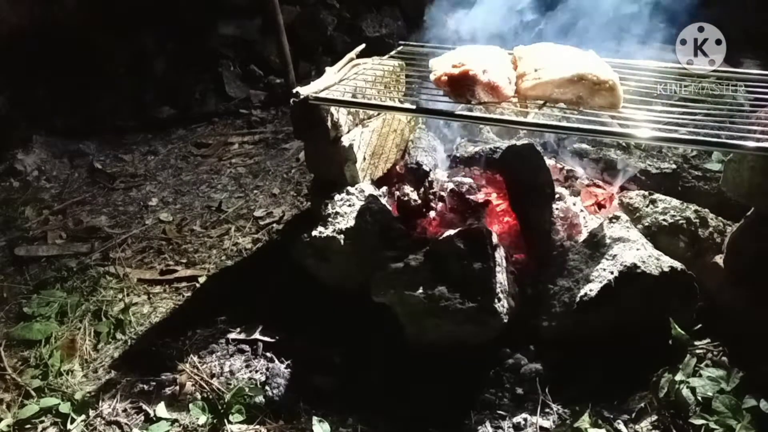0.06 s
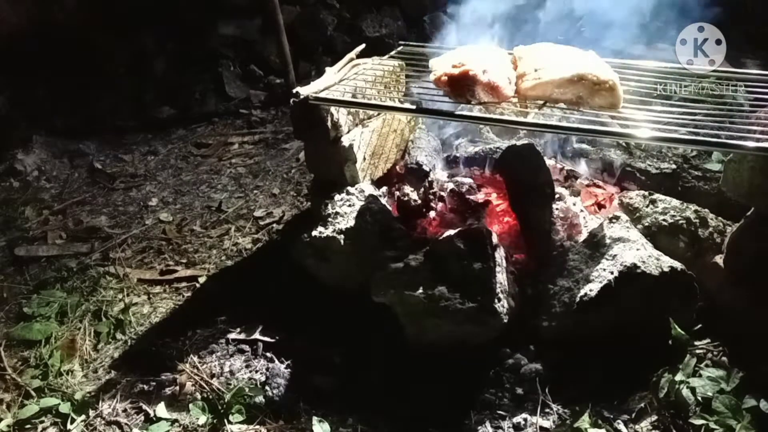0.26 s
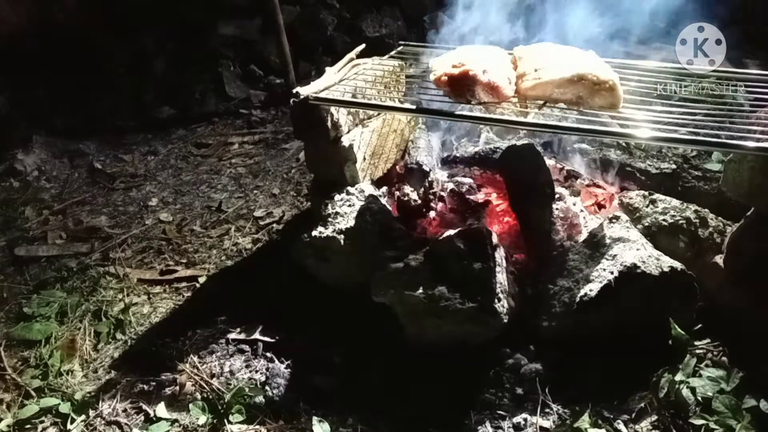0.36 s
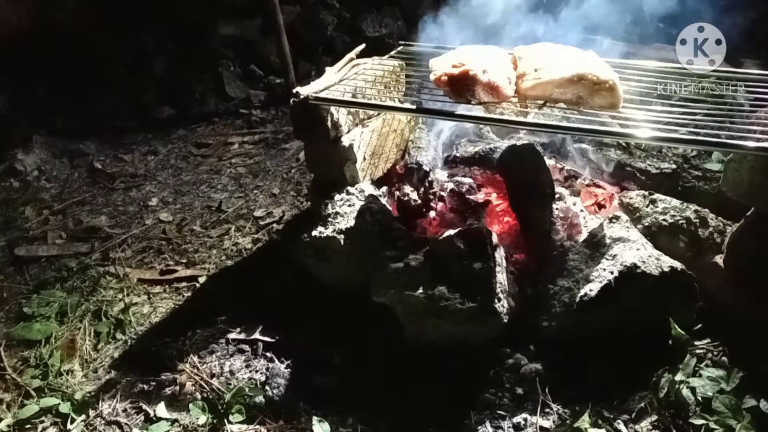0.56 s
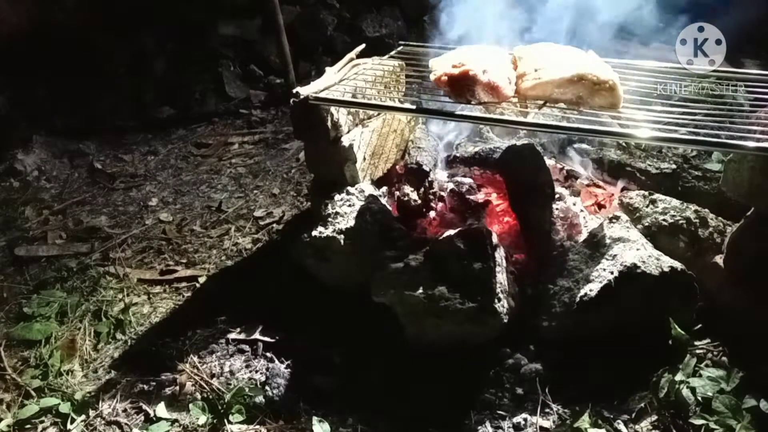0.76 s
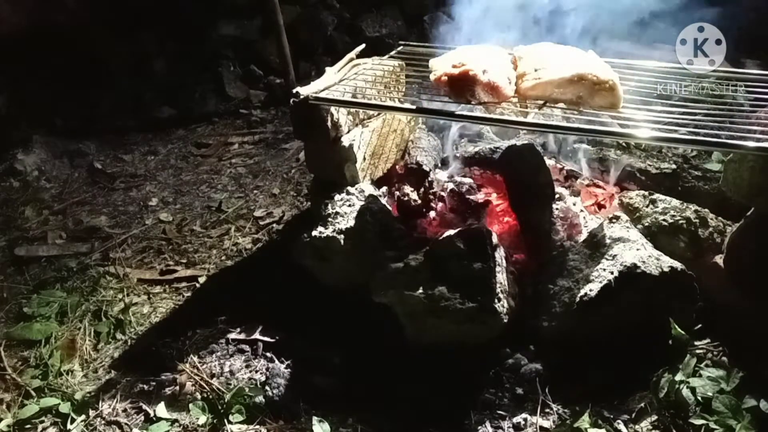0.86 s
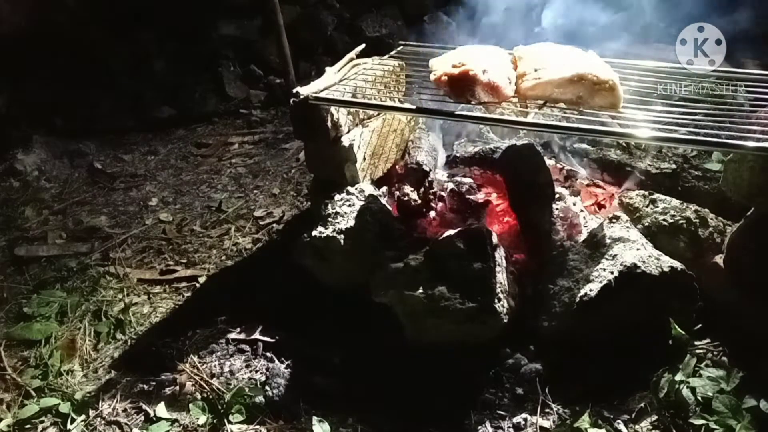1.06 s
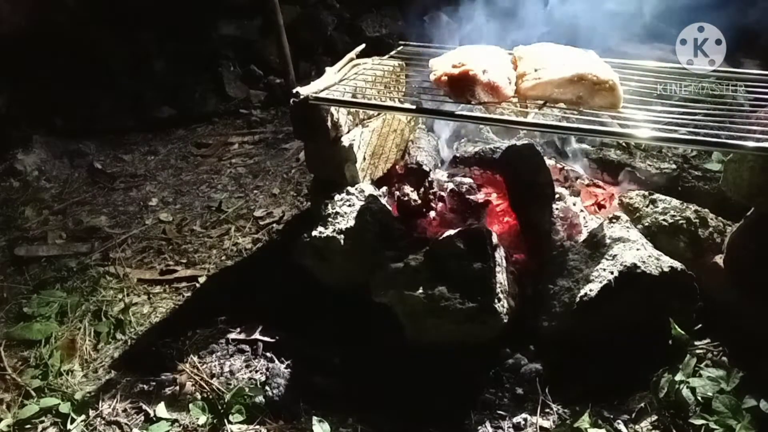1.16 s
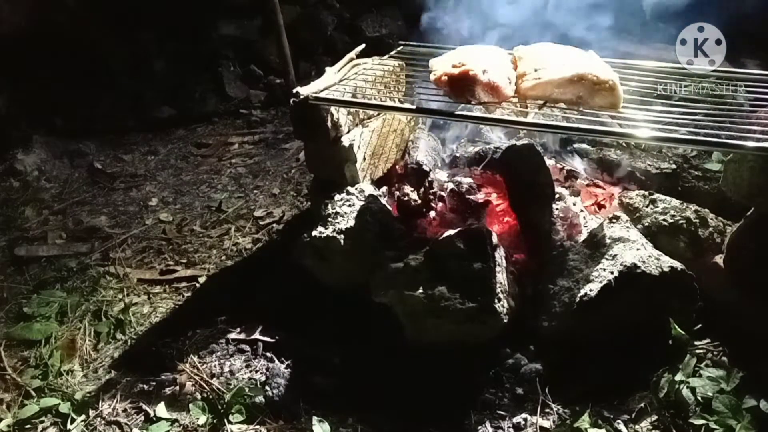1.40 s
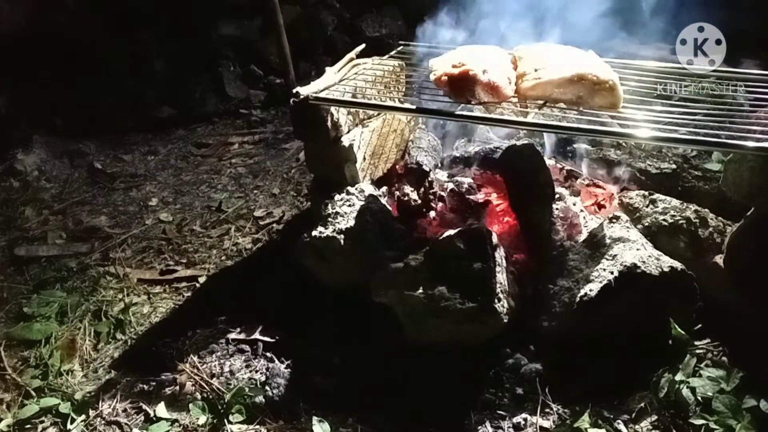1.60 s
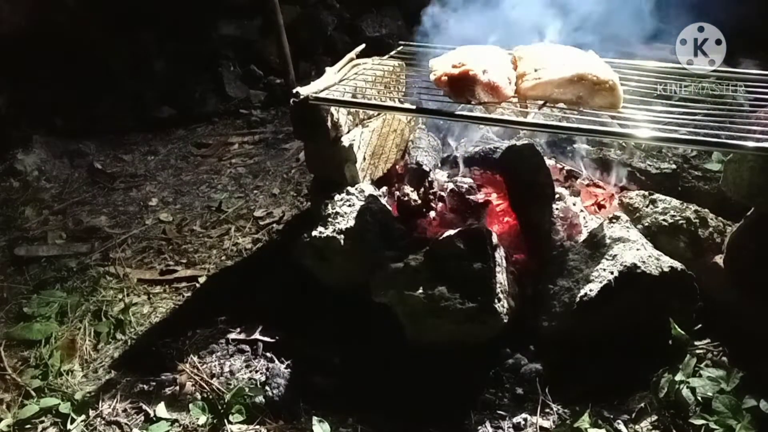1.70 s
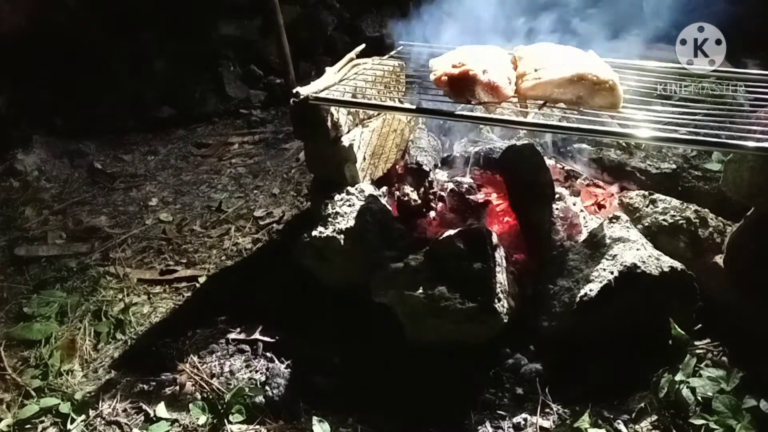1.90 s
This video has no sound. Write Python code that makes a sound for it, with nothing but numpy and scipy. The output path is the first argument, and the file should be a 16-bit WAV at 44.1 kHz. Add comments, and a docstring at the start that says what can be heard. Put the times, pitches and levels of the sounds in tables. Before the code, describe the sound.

A small hollow vessel lands with a bright clack, rings briefly and knocks about unevenly, close to the microphone; campfire embers tick and hiss faintly over a low rumble, while crickets trill in the night woods.

```python
"""Something hollow, probably cookware, is set down with a clack and knocks about, ringing briefly: each
knock sums a decaying tone, bursts of coloured noise and a bank of damped modes. It stands by a campfire
at night, whose embers tick and crackle (short decaying noise) and hiss over a low rumble (filtered noise).
Crickets trill in the woods: pulsed sines, smeared by a decaying noise response."""
import sys
import numpy as np
from scipy import signal
from scipy.fft import rfft, irfft, next_fast_len
from scipy.io import wavfile
from scipy.ndimage import map_coordinates

SR = 44100
rng = np.random.default_rng(int(sys.argv[2]) if len(sys.argv) > 2 else 0)


def output_pcm(signal):
    """Save a mono or channel-first signal as 16-bit PCM at the path in sys.argv[1].

    Samples are clipped to [-1, 1] before scaling.
    """
    pcm = np.clip(np.atleast_2d(signal).T, -1, 1) * 32767
    wavfile.write(sys.argv[1], SR, np.round(pcm).astype(np.int16))


N = 83790
T = np.arange(N) / SR  # time in s
RATTLE_S = 0.0088  # the sound builds up while the contact chatters; 60 dB approach time

# The blows on the hollow vessel, levels before the vessel's low cut. Each row: start in seconds, level of
# the hollow tone in dB, its pitch in Hz, level of the clack in dB, of the crack in dB, of the ring in dB,
# the two pitches, in Hz, around which the ring is favoured, their lift in dB, ring tilt in dB per octave.
VESSEL_KNOCKS = [(.206, -20.5, 748, -26.5, -21, -30.5, 781, 3886, 3, 0),
                 (0.4907, -18.5, 853, -34, -50, -39, 980, 1620, 7.1, -5),
                 (.5445, -23, 830, -37, -56, -40, 1180, 1700, 13, -2.5),
                 (.607, -30.5, 714, -50, -70, -61, 890, 2228, 12, -4),
                 (.691, -37.5, 770, -82, -79, -63, 781, 2650, 3, -16),
                 (.7425, -22, 770, -47, -63, -47, 1130, 990, 21, -3),
                 (.919, -38.5, 809, -69, -74, -68, 890, 1620, 8.2, -1.5),
                 (.9835, -46, 900, -49, -62, -55, 1141, 1830, 22, -1),
                 (1.077, -33.5, 863, -49, -49.5, -57, 938, 1141, 10.4, -5),
                 (1.2765, -33, 896, -44, -41, -55.5, 890, 2783, 8, -2.5),
                 (1.4055, -19, 746, -45, -45, -48, 781, 2630, 12.4, -4.5),
                 (1.5755, -34.5, 859, -55.5, -46.5, -68, 2700, 3680, 17, -1),
                 (1.704, -45.5, 866, -76, -83, -85, 890, 2640, 4.2, -10)]


def amp(db):
    """Level law: decibels to amplitude gain."""
    return 10 ** (np.asarray(db) / 20)


def unit(x):
    """Normalisation: scale to rms 1."""
    return x / np.sqrt(np.mean(x ** 2) + 1e-20)


def fade(t60):
    """Exponential decay from time zero, falling 60 dB in t60 seconds."""
    return np.exp(-np.log(1000) * T / t60)


def filtered(x, response):
    """Linear filtering: the spectrum of x times a response of frequency."""
    size = next_fast_len(N + 8192)
    spectrum = rfft(x, size) * response(np.fft.rfftfreq(size, 1 / SR))
    return irfft(spectrum, size)[:N]


def noise(points):
    """Coloured noise: white noise shaped by (Hz, dB) points along log frequency, at rms 1."""
    f, db = np.transpose(points)
    white = rng.standard_normal(N)
    return unit(filtered(white, lambda hz: amp(np.interp(np.log(hz + 1), np.log(f), db))))


def wobble(rate, t=T):
    """Random modulation: a smooth curve through normal random knots, rate knots a second."""
    return map_coordinates(rng.standard_normal(4096), [t * rate], mode="wrap")


def delayed(x, s):
    """Pure delay: x starting s seconds later."""
    return np.pad(x, (max(round(s * SR), 0), 0))[:N]


def hollow_tone(pitch):
    """Cavity resonance: one damped sine with a soft onset, answered by a nearby surface."""
    t60, rise_s = 0.06, 0.0015
    echo_s, echo_db = 0.012, -9
    tone = np.sin(2 * np.pi * pitch * T) * fade(t60) * (1 - np.exp(-(T / rise_s) ** 2))
    return tone + amp(echo_db) * delayed(tone, echo_s)


def contact_burst(clack_db, crack_db):
    """Impact noise: dense clack and brighter crack, each with a fast decay and a weaker, slower tail."""
    # Spectrum of the clack. Each row: frequency in Hz, level in dB.
    clack_colour = [(300, -25), (500, -24), (620, 8), (900, 3), (1050, -12.5), (1600, 1), (2200, -5.5),
                    (2700, 2.5), (3100, -22), (4000, -8), (6000, -20), (10000, -49)]
    # Spectrum of the crack. Each row: frequency in Hz, level in dB.
    crack_colour = [(1500, -27), (3500, -1), (5500, 1.5), (8000, 1), (10500, 0.5), (13000, -5),
                    (16000, -17)]
    clack_t60, clack_tail_db, clack_tail_t60 = 0.089, -19, .28
    crack_t60, crack_tail_db, crack_tail_t60 = 0.046, -19, .2
    clack = noise(clack_colour) * (fade(clack_t60) + amp(clack_tail_db) * fade(clack_tail_t60))
    crack = noise(crack_colour) * (fade(crack_t60) + amp(crack_tail_db) * fade(crack_tail_t60))
    return (amp(clack_db) * clack + amp(crack_db) * crack) * (1 - fade(RATTLE_S))


def vessel_ring(ring_db, focus_hz, lift_db, tilt_db):
    """Modal synthesis: damped sines, the modes that the point of contact favours being lifted."""
    # The vessel's upper modes. Each row: frequency in Hz, level in dB, 60 dB decay time in seconds.
    vessel_modes = [(779, 3, .26), (890, -6, .22), (938, 0, .3), (980, -11, .25), (1141, -7, .17),
                    (1168, -12, .22), (1320, -8, .2), (1451, 1, .17), (1620, -7, .14), (1770, -6, .14),
                    (1948, 0, .11), (2228, -5, .18), (2380, -5, .1), (2700, -1, .11), (2783, -4, .16),
                    (2857, -3, .19), (2986, -7, .24), (3241, -3, .16), (3680, -7, .17), (3886, -10, .3),
                    (4160, -6, .18), (4520, -6, .13), (5447, -8, .15), (5882, -8, .13), (6205, -7, .1),
                    (7910, -4, .12), (9245, 0, .07)]
    focus_oct = .055  # width of the favoured region in octaves
    waver_rad, waver_per_s = .55, 45  # phase waver and its knots a second
    hz, level, t60 = np.transpose(vessel_modes)
    t = T[:SR // 3]
    decays = np.exp(-np.log(1000) * t / t60[:, None]) * (1 - fade(RATTLE_S)[:len(t)])
    favour = sum(np.exp(-(np.log2(hz / f) / focus_oct) ** 2) for f in focus_hz)
    # a random phase waver roughens the ring
    waver = waver_rad * np.array([wobble(waver_per_s, t) for _ in hz])
    start_cycle = rng.random((len(hz), 1))
    modes = decays * np.sin(2 * np.pi * (hz[:, None] * t + start_cycle) + waver)
    gains = amp(ring_db + level + lift_db * favour + tilt_db * np.log2(hz / hz[0]))
    return np.pad(gains @ modes, (0, N - len(t)))


def knocks():
    """Impact excitation: each blow sums cavity tone, contact noise and modes, with little radiated low down."""
    baffle_hz = 528  # the small vessel radiates little below this
    out = np.zeros(N)
    for s, hollow_db, pitch, clack_db, crack_db, ring_db, *focus_hz, lift_db, tilt_db in VESSEL_KNOCKS:
        hollow = amp(hollow_db) * hollow_tone(pitch)
        burst = contact_burst(clack_db, crack_db)
        ring = vessel_ring(ring_db, focus_hz, lift_db, tilt_db)
        out += delayed(hollow + burst + ring, s)
    return signal.sosfilt(signal.butter(6, baffle_hz, "high", fs=SR, output="sos"), out)


def bending_ring():
    """Mode of varying frequency: the lowest mode sings on, bends as the vessel tilts and is damped."""
    # Pitch path of the lowest mode. Each row: time in seconds, frequency in Hz.
    pitch_path = [(.21, 589.6), (0.359, 598), (.46, 620), (0.519, 596), (.6, 564)]
    level_db, t60 = -44.5, 1.45
    damp_s = 0.026  # time constant of the damping after the last point of the path
    s, hz = np.transpose(pitch_path)
    tone = np.sin(2 * np.pi * np.cumsum(np.interp(T, s, hz)) / SR)
    damping = np.exp(-np.maximum(T - s[-1], 0) / damp_s)
    envelope = delayed(fade(t60) * (1 - fade(RATTLE_S)), VESSEL_KNOCKS[0][0])
    return amp(level_db) * tone * envelope * damping


def thud():
    """Damped oscillation: a soft, low sine as one knock also bumps the ground."""
    start_s, level_db, hz, t60 = 1.277, -31, 321, 0.036
    bump = np.sin(2 * np.pi * hz * T) * fade(t60) * (1 - fade(RATTLE_S))
    return amp(level_db) * delayed(bump, start_s)


def ticks():
    """Impulsive emission: sharp ember snaps with a faint scatter, over a random crackle of tiny ones."""
    # The separate ember snaps. Each row: start in seconds, peak level before the scatter in dB.
    ember_ticks = [(0.0422, -32.5), (0.1136, -36), (.130, -28.5), (.1675, -27.5), (.343, -42),
                   (0.347, -26.5), (.366, -45), (.5236, -15), (.8193, -28.5), (0.825, -36), (.9092, -24.5),
                   (1.0214, -26.5), (1.0633, -34), (1.263, -34), (1.2982, -28.5), (1.3895, -29),
                   (1.6955, -41)]
    # Spectrum of snaps, scatter and crackle. Each row: frequency in Hz, level in dB.
    tick_colour = [(1000, -23), (3000, -20), (6000, -14), (8500, 3.5), (12000, -1), (16000, -2)]
    snap_t60, scatter_db, scatter_t60 = 0.0024, -20, 0.042
    crackle_per_s, crackle_db, crackle_spread_db = 23, -53, 4
    out = np.zeros(N)
    for s, db in ember_ticks:
        snap = noise(tick_colour) * fade(snap_t60)
        scatter = amp(scatter_db) * noise(tick_colour) * fade(scatter_t60)
        out += amp(db) * delayed(snap / np.abs(snap).max() + scatter, s)
    strengths = amp(crackle_db + crackle_spread_db * rng.uniform(-0.88, 1, N))
    sparks = (rng.random(N) < crackle_per_s / SR) * strengths
    crackle = signal.fftconvolve(sparks, fade(snap_t60))[:N] * noise(tick_colour)
    return out + crackle


def sizzle():
    """Amplitude-modulated noise: a grainy hiss that swells in brief spurts."""
    # The sizzling spurts. Each row: centre in seconds, half length (to 1/e) in seconds, mean level in dB.
    spurts = [(.14, 0.045, -57), (0.348, 0.034, -46)]
    # Spectrum of the hiss. Each row: frequency in Hz, level in dB per Hz.
    hiss_colour = [(1200, -16), (2500, -12), (3600, -10.5), (5000, -6.5), (7600, -2.5), (8800, 1),
                   (12000, -1.5), (15500, -3.5)]
    steady = amp(-59)
    swells = sum(amp(db + 4.7 * wobble(253.7)) * np.exp(-((T - s) / half) ** 2) for s, half, db in spurts)
    grain = amp(1.0 * wobble(650))
    return (steady + swells) * grain * noise(hiss_colour)


def frying():
    """Decaying noise source: a lower sizzle that wavers as it dies down."""
    # Spectrum of the frying. Each row: frequency in Hz, level in dB per Hz.
    fry_colour = [(800, -17), (1800, -5.5), (4000, -2.5), (7000, -0.5), (12000, -22)]
    start_db, fall_db_per_s, swing_db = -67.5, 6.5, 2.5
    return amp(start_db - fall_db_per_s * T + swing_db * wobble(29.85)) * noise(fry_colour)


def rumble():
    """Low-frequency noise: the rumble of the fire, gently unsteady."""
    # Spectrum of the rumble. Each row: frequency in Hz, level in dB per Hz.
    rumble_colour = [(20, -6), (33, -45), (50, -11.5), (85, 2.5), (115, 1.5), (170, -7.5), (260, -11.5),
                     (400, -25.5), (1000, -39), (3000, -80)]
    return amp(-50.5 + 1.54 * wobble(9.4)) * noise(rumble_colour)


def cricket_chorus(count=14):
    """Incoherent summation: far trills of pulsed sines, spread in pitch and stroke rate."""
    centre_hz, spread_hz, trill_per_s = 6810, 115, 45
    chorus = np.zeros(N)
    for place in np.linspace(-1, 1, count):
        pitch = centre_hz + spread_hz * place + 75 * wobble(90)
        stroke_rate = trill_per_s * rng.uniform(.7, 1.3)
        strokes = np.sin(np.pi * (stroke_rate * T + rng.random())) ** 4
        chorus += amp(6.2 * wobble(5.72)) * strokes * np.sin(2 * np.pi * np.cumsum(pitch) / SR)
    return amp(-54.5) * unit(chorus)


def near_cricket():
    """Amplitude and frequency modulation: a nearer, higher chirper whose pitch sags in each syllable."""
    # Chirps of the nearest cricket. Each row: centre in seconds, level in dB.
    chirps = [(0.039, -52.5), (.32, -52.5), (.595, -53), (.94, -54.5), (1.275, -56.5), (1.565, -51),
              (1.86, -48.5)]
    chirp_hz, half_s = 6978, 0.066  # mean pitch; half length of a chirp (to 1/e)
    syllables_per_s, sag_hz = 19.7, 50.3
    syllable = (syllables_per_s * T) % 1  # position within the syllable, 0 to 1
    pitch = chirp_hz - sag_hz * (syllable - .5) + 25 * wobble(150)
    swell = sum(amp(db) * np.exp(-((T - s) / half_s) ** 2) for s, db in chirps)
    return swell * unit(np.sin(np.pi * syllable) ** 2 * np.sin(2 * np.pi * np.cumsum(pitch) / SR))


def crickets():
    """Diffuse scattering: all the insects' song plus its convolution with decaying noise, for the trees."""
    # Spectrum of the farthest insects. Each row: frequency in Hz, level in dB.
    farthest_colour = [(5600, -50), (6250, -5), (6550, 4.5), (6950, 5), (7150, -60), (7600, -23)]
    woods_t60, woods_db = 0.21, -5.5
    song = cricket_chorus() + near_cricket() + amp(-62.5) * noise(farthest_colour)
    trees = rng.standard_normal(N) * fade(woods_t60)
    trees = trees / np.linalg.norm(trees)
    return song + amp(woods_db) * signal.fftconvolve(song, trees)[:N]


def night_air():
    """Broadband ambient noise: the night air, unsteady and slowly falling in level."""
    # Spectrum of the air. Each row: frequency in Hz, level in dB per Hz.
    air_colour = [(200, -5.5), (470, -7.5), (800, 3), (1000, -3), (1300, -11.5), (2200, -27.5), (5000, -49),
                  (12000, -35)]
    start_db, fall_db_per_s = -58, 1.5
    return amp(start_db - fall_db_per_s * T + 2.0 * wobble(14.44)) * noise(air_colour)


def scene():
    """Superposition: the pressures of all sources add at one microphone."""
    vessel = knocks() + bending_ring() + thud()
    fire = ticks() + sizzle() + frying() + rumble()
    return (vessel + fire + crickets() + night_air())[None]


def record(dry):
    """Band limiting: the recorder keeps nothing from its upper limit on."""
    top_hz = 15750
    return np.array([filtered(ch, lambda hz: hz < top_hz) for ch in dry])


dry = scene()
out = record(dry)
output_pcm(out)
```